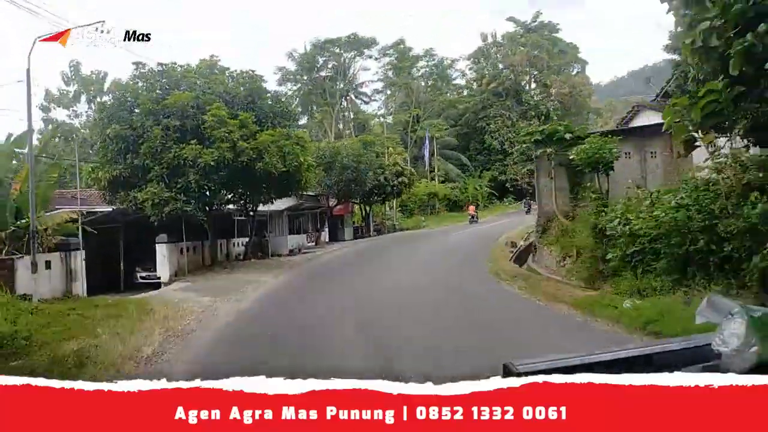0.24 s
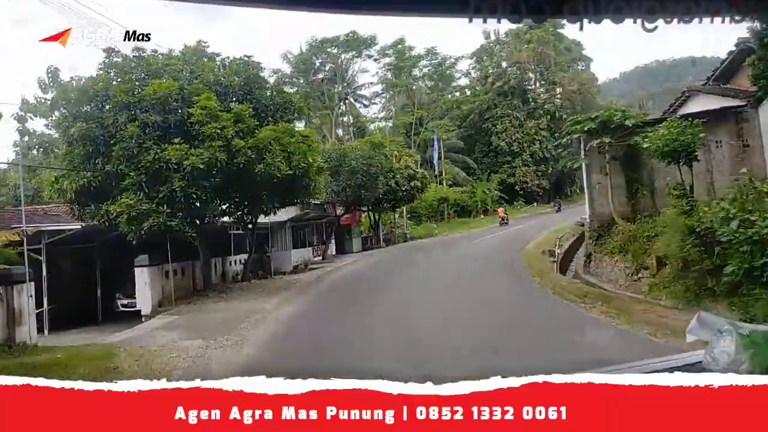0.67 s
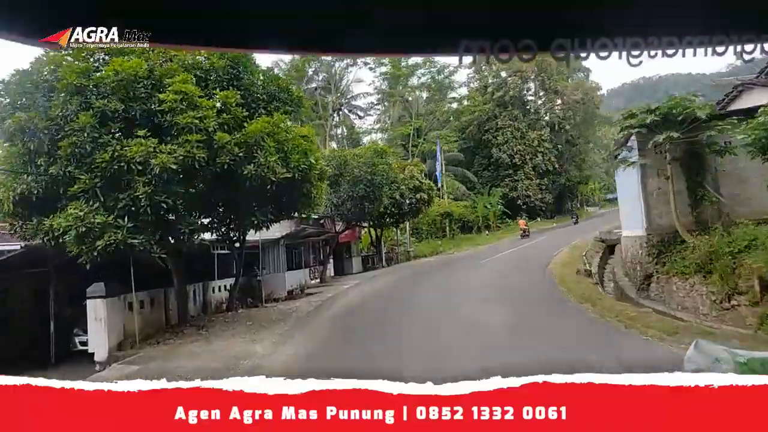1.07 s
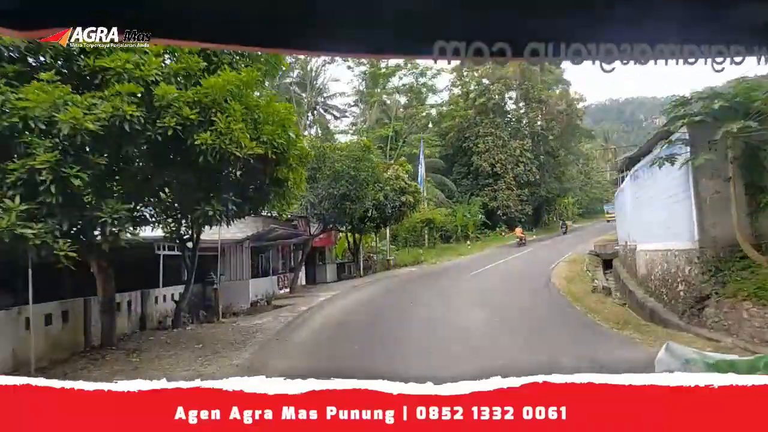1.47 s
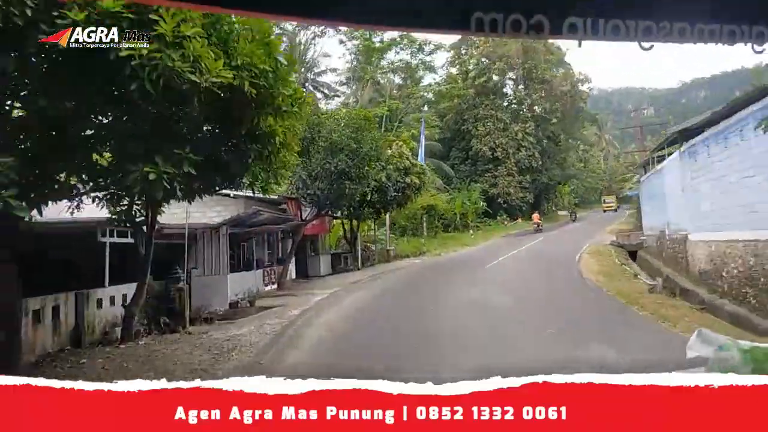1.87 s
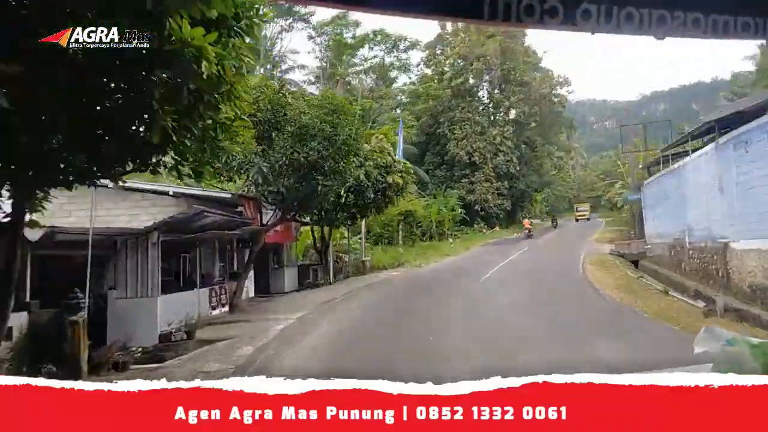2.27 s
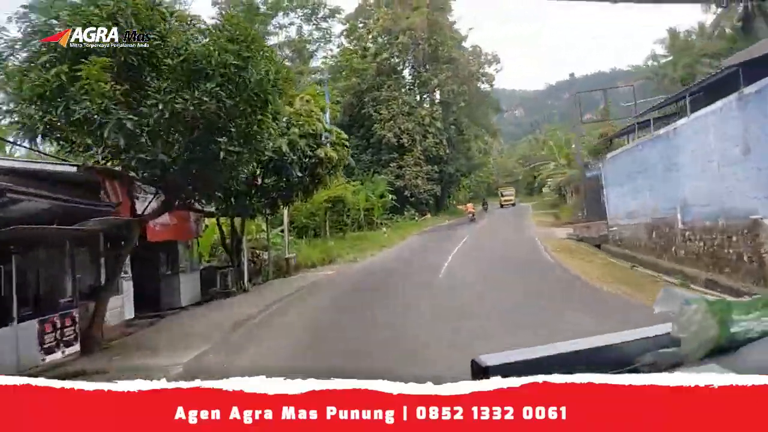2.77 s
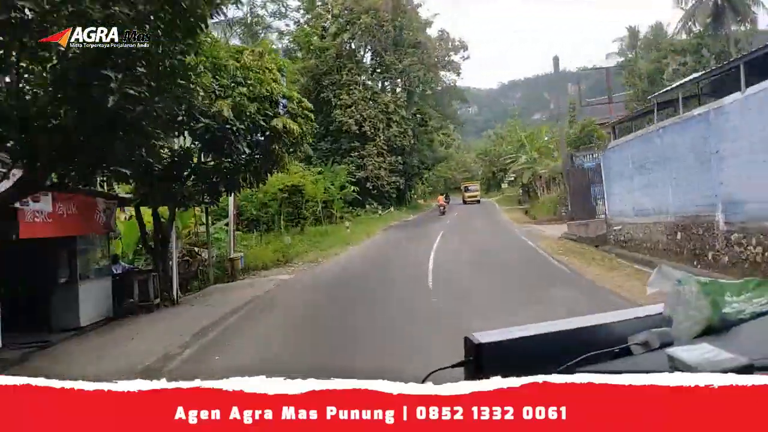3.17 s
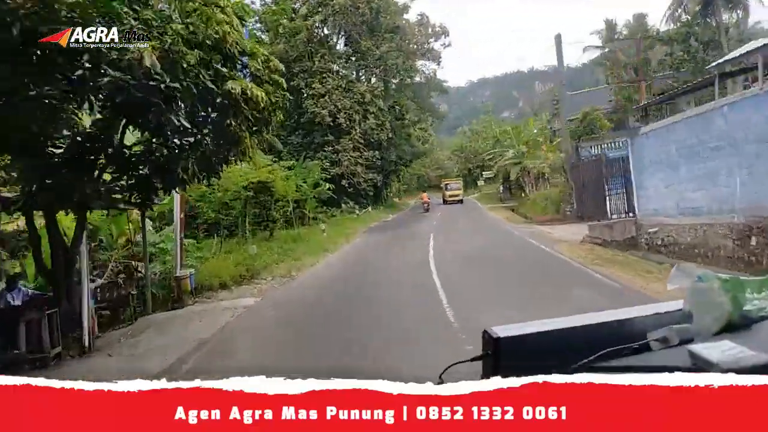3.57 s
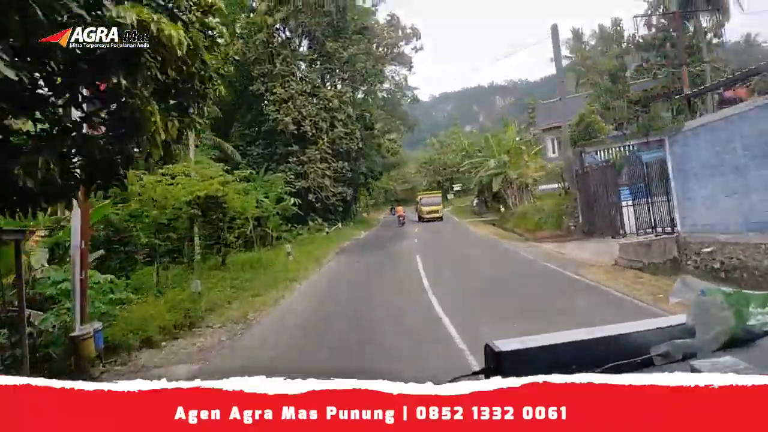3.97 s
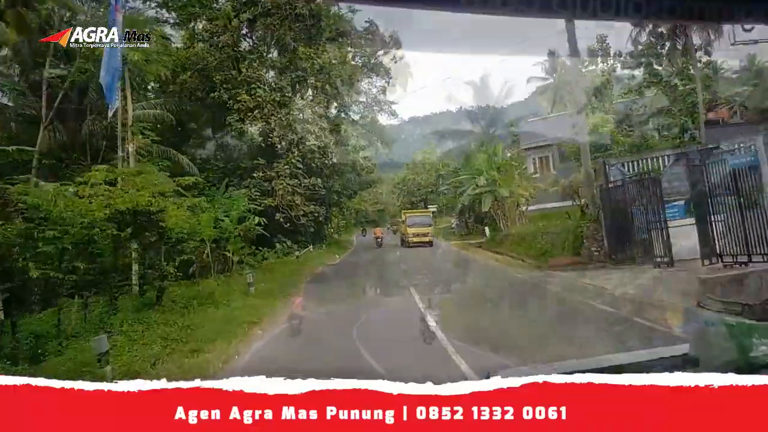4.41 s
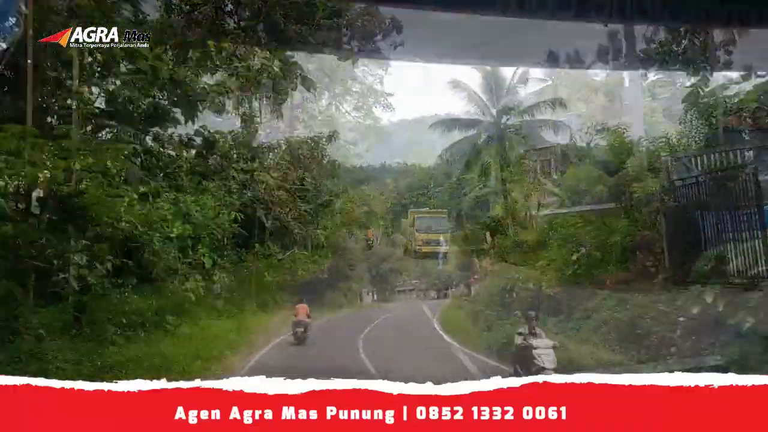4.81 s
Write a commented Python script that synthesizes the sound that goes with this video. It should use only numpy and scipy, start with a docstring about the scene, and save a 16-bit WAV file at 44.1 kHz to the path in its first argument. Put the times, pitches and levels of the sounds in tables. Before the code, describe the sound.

A coach's diesel hums and booms from far behind the cab, heard from just behind the windscreen, its pitch creeping upward. The tyres rumble and the body rocks with low thuds on the uneven road. As the coach leaves a bend, tyre and wind hiss grows louder, joined by brief trim squeaks, faint dashboard rattles and a thin gear whine. The rumble eases slightly towards the end.

```python
"""A six-cylinder diesel drones far behind the cab of a coach on a country road, slowly gaining speed.
Its firing makes a stack of low notes, which boom when they match a pitch the body likes to ring at.
Bumps shake the body, the tyres roar, and a hiss of tyres and air swells as the coach leaves a bend.
Loose things on the dashboard rustle faintly, the trim squeaks a few times, and belts and gears whine."""
import sys
import numpy as np
from scipy import signal
from scipy.fft import rfft, irfft
from scipy.io import wavfile
from scipy.ndimage import uniform_filter1d

SR = 44100
rng = np.random.default_rng(int(sys.argv[2]) if len(sys.argv) > 2 else 0)


def wrap_up_sound(samples):
    """Save the sound to the file named by the first command line argument, as 16-bit audio."""
    columns = np.atleast_2d(samples).T
    # keep every value between -1 and 1, then stretch to whole-number steps
    tamed = np.clip(columns, -1, 1)
    steps = np.round(tamed * 32767).astype(np.int16)
    wavfile.write(sys.argv[1], SR, steps)


N = 222602
TIME = np.arange(N) / SR
FREQS = np.maximum(np.arange(N // 2 + 1) * SR / N, 1)

# Notes of belts and gears. Each row: cycles per engine turn, level in dB, then the pitch in Hz
# at which their housing rings, the width of that ringing in Hz, and its boost in dB.
WHINE_NOTES = [(6.75, -64, 163, 10, 13), (22.4, -70, 590, 10, 11), (37, -73, 913, 16, 12),
               (37.75, -75, 911, 22, 9), (52, -72, 1314, 50, 11)]
# Trim squeaks. Each row: middle and length in seconds, pitch in Hz, tone level in dB, scrape level in dB.
TRIM_SQUEAKS = [(2.03, 0.15, 1885, -45, -55), (2.34, 0.18, 1905, -45.5, -56), (3.9, 0.26, 2225, -50, -52),
                (4.35, 0.21, 1616, -45.5, -66), (4.445, 0.08, 2260, -46.5, -70),
                (4.53, 0.06, 2480, -48, -70), (4.775, 0.04, 2595, -37, -42.5),
                (4.805, 0.018, 2580, -38, -42), (4.995, 0.07, 2560, -42, -43),
                (5.045, 0.055, 2580, -37.5, -40)]
# The strongest jolts on the dashboard. Each row: start in seconds, crinkle level in dB,
# rattle level in dB, seconds to die away by 60 dB.
DASHBOARD_JOLTS = [(.029, -64, -81, .3), (.2, -77, -84, .35), (.49, -70.5, -80, .4), (.56, -78, -86, .5),
                   (.65, -78, -80, .5), (.93, -79, -72, .4), (1.0, -72.5, -80, .4), (1.07, -75, -84, .4),
                   (1.34, -77, -69, .45), (1.62, -69, -77, .45), (1.9, -74, -74, .35),
                   (2.15, -68, -60, .27), (2.268, -60, -63, .25), (2.497, -67, -76, .14),
                   (2.79, -67.5, -67, .38), (3.368, -72, -63, .25), (3.51, -75, -61, .32),
                   (3.683, -67.5, -56.5, .3), (3.944, -68, -61, .25), (4.755, -73, -60, .4),
                   (4.99, -73, -61, .32), (5.025, -69, -60, .32)]
# Bumps in the road. Each row: strongest moment in seconds, level in dB, rocking rate in Hz.
ROAD_BUMPS = [(.07, -22.5, 26), (.27, -18.5, 20.6), (.66, -20, 24), (0.939, -22, 22.8),
              (2.161, -17.5, 15.5), (2.369, -16.5, 19.5), (2.5, -20.5, 24), (2.749, -17.5, 17),
              (2.901, -17.5, 18), (3.161, -22.5, 23.2), (3.299, -16.5, 21.1), (4.081, -19, 23),
              (4.201, -27, 24.6)]
# The rush of tyres and air, which jumps as the coach leaves the bend. Only its rise and fall is used.
# Each row: time in seconds, level in dB.
ROAD_RUSH = [(0, -53.5), (1.2, -55.5), (1.66, -57), (1.82, -47.5), (2.0, -44), (2.6, -43), (2.95, -40.5),
             (4.02, -38.5), (4.35, -42), (4.55, -43), (4.75, -39.5), (5.05, -41.5)]
# Brief surges of the hiss. Each row: middle in seconds, boost in dB.
HISS_SURGES = [(2.78, 3.5), (3.06, 2.5), (3.38, 2), (3.82, 0), (3.97, 2.5)]

# A noise's colour is its mix of low and high. Each row: frequency in Hz, relative strength in dB.
SCRAPE_COLOUR = [(1200, -35), (1850, -7), (2250, 3.5), (2400, 3), (2570, 3), (2720, -1), (2880, -2.5),
                 (3050, -6.5), (3250, -7.5), (3430, -8.5), (3650, -19.5), (5000, -41), (9000, -49)]  # rubbing trim
CRINKLE_COLOUR = [(4000, -16.5), (6000, -10), (8300, -12), (10000, -3.5), (11000, -1), (12700, -7.5),
                  (14000, -13), (16000, -23)]  # thin plastic
RATTLE_COLOUR = [(2200, -8.5), (3300, 5), (4300, -0.5), (5800, -7.5), (7500, -27.5), (10000, -26.5)]  # harder fittings
SHAKE_COLOUR = [(7, -9.5), (13, -6), (21, -0.5), (27, -1), (33, -10), (42, -22), (55, -24.5), (80, -45.5)]  # the body on its springs
RUMBLE_COLOUR = [(35, 5), (47, 8.5), (57, -3.5), (68, 11), (80, 11), (93, 2.5), (125, -0.5), (142, 1),
                 (165, -6.5), (210, -3), (260, -10), (330, -7.5), (420, -13), (550, -16.5), (900, -55)]  # deep road noise
ROAR_COLOUR = [(180, -15), (300, -8), (380, -14), (470, 0.5), (600, -0.5), (680, 3.5), (770, -0.5),
               (920, 1), (1100, -4.5), (1500, -8.5), (2500, -18), (3200, -19.5), (4200, -46.5)]  # tyres
HISS_COLOUR = [(600, -8), (1000, -3.5), (1300, -1.5), (1500, -3), (1830, 0.5), (2050, -1), (2300, 1.5),
               (2550, -3), (2800, -7), (3200, -17), (4000, -26), (5000, -38.5), (7000, -44), (15000, -62.5)]  # tyres and air
SIZZLE_COLOUR = [(3500, 7), (6000, -4.5), (8500, -9), (9500, -4), (10600, 2), (11500, -0.5), (12700, 0.5),
                 (13500, -5), (15700, -4.5)]  # air at the window seals

# Pitches at which the cab rings, colouring roar and hiss. Each row: pitch in Hz, width in Hz, boost in dB.
CAB_RESONANCES = [(592, 16, 4), (660, 16, 2), (1314, 30, 3.5), (1411, 20, 4), (1620, 14, 4),
                  (1830, 50, 2.5), (1915, 30, 3), (2040, 16, 3)]
# Pitches at which the body makes an engine note boom, or drop out if the boost is negative.
# Each row: pitch in Hz, width in Hz, boost in dB.
BODY_RESONANCES = [(65, 2.5, 5), (84.5, 5, 7.5), (90.5, 4, -4), (102.5, 3, 8), (115.5, 4, 5),
                   (196.4, 8.7, 12), (214.1, 19.1, 19), (228.8, 7.6, 9), (233.3, 3, -11), (254, 10, 3),
                   (266, 5, 7), (281, 6, 4), (293.5, 8, 8.5), (299.5, 4, 9), (304.3, 4, -16),
                   (310.3, 4, 7.5), (591.4, 22, 9), (660, 19, 7)]
# How fast the engine turns. Each row: time in seconds, turns per second.
ENGINE_SPEED = [(0, 24.38), (1, 24.0), (1.5, 24.22), (2.5, 24.99), (3, 25.5), (3.5, 25.86), (4, 26.12),
                (4.5, 26.17), (5.05, 26.42)]
# The note of the cylinders firing, three times a turn. Each row: time in seconds, level in dB.
FIRING_LEVEL = [(0, -31), (.18, -30.5), (.44, -44), (.55, -29), (.63, -39), (.8, -40), (.93, -32),
                (1.05, -36), (1.3, -33), (1.5, -40), (1.84, -43), (1.97, -28.5), (2.27, -24), (2.39, -29),
                (2.55, -26), (2.68, -28.5), (2.8, -26), (3.22, -25.5), (3.34, -29), (3.53, -26.5),
                (3.66, -36), (3.85, -33), (4.07, -27), (4.2, -37), (4.42, -31.5), (4.68, -35), (4.9, -32),
                (5.05, -34)]
# The engine's other notes. Each row: cycles per engine turn, level in dB before any boost or fade.
ENGINE_NOTES = [(1.5, -37), (2.5, -44.5), (3.5, -44.5), (4, -56), (4.5, -47.5), (5, -50), (5.5, -59),
                (6, -55), (7.5, -61), (8, -70), (9, -58.5), (10, -56.5), (11, -61.5), (12, -56), (13, -60),
                (13.5, -59), (15, -60), (18, -67), (21, -65), (23, -69), (25, -68), (26, -68)]

# Each road noise has a base level in dB and follows a share of the rush's rise and fall.
SHAKE_DB, SHAKE_FOLLOWS = -27, 0.15
RUMBLE_DB, RUMBLE_FOLLOWS = -35, 0.2
ROAR_DB, ROAR_FOLLOWS = -48, 0.53
HISS_DB, HISS_FOLLOWS = -48.5, 0.96
SIZZLE_DB, SIZZLE_FOLLOWS = -71, 0.32
# From this moment on, the rumble, the roar and the engine's other notes die down.
CALM_FROM_S = 4.03
SECONDS_CALM = np.maximum(TIME - CALM_FROM_S, 0)
RUMBLE_FADE_DB_PER_S, ROAR_FADE_DB_PER_S, NOTES_FADE_DB_PER_S = 8, 6.5, 6.5


def from_db(db):
    """Turn decibels into a number to multiply a sound by."""
    return 10 ** (np.asarray(db) / 20)


def unit_power(x):
    """Scale a signal so that its average power is 1."""
    return x / np.sqrt(np.mean(x ** 2) + 1e-20)


def curve(rows):
    """Join (time, value) points with straight lines, giving a value at every sample."""
    return np.interp(TIME, *np.transpose(rows))


def drift(rate_hz):
    """A random wander of typical size 1 that changes about rate_hz times a second."""
    return unit_power(irfft(rfft(rng.standard_normal(N)) / (1 + (FREQS / rate_hz) ** 4), N))


def boost_db(hz, resonances):
    """How much resonances, the pitches a thing likes to ring at, raise or lower a sound at hz."""
    return sum(db / (1 + (2 * (hz - centre) / width) ** 2) for centre, width, db in resonances)


def noise(colour, resonances=()):
    """Noise of power 1 with the given colour and resonances, falling away steeply at both ends."""
    hz, db = np.transpose(colour)
    shape_db = np.interp(np.log(FREQS), np.log(hz), db) + boost_db(FREQS, resonances)
    ends = np.minimum(FREQS / hz[0], 1) ** 2 * np.minimum(hz[-1] / FREQS, 1) ** 4
    return unit_power(irfft(rfft(rng.standard_normal(N)) * from_db(shape_db) * ends, N))


def steadied(x, samples):
    """Even out the slow swells of a noise, keeping its quick lumps."""
    return x / np.sqrt(uniform_filter1d(x ** 2, samples) + 1e-12)


def swell_db(lead_s=0):
    """How far the rush is above its average, looking lead_s seconds ahead."""
    rush = curve(ROAD_RUSH)
    return np.interp(TIME + lead_s, TIME, rush - rush.mean())


def shower(start, rise_s, decay_s):
    """The loudness of a shower of tiny taps: it builds quickly, then falls 60 dB in decay_s."""
    age = np.maximum(TIME - start, 0)
    return (1 - np.exp(-age / rise_s)) * np.exp(-np.log(1000) * age / decay_s)


def whine(pitch_wander=0.0014, waver_db=2.5):
    """Belts and gears sing thin, wavering notes that follow the engine's speed."""
    speed = curve(ENGINE_SPEED)
    out = np.zeros(N)
    for per_turn, db, *housing in WHINE_NOTES:
        hz = per_turn * speed
        phase = 2 * np.pi * np.cumsum(hz * (1 + pitch_wander * drift(4.4))) / SR
        level_db = db + boost_db(hz, [housing]) + waver_db * drift(4.8)
        out += np.sqrt(2) * from_db(level_db) * np.sin(phase)
    return out


def faint_jolts(count=25, crinkle_db=-77, rattle_db=-78, spread_db=5, decay_s=0.38):
    """Weaker jolts come at random times; the rows are laid out like DASHBOARD_JOLTS."""
    delay, softness = rng.random((count, 2)).T
    starts = (np.arange(count) + delay) / count * TIME[-1]
    drops_db = spread_db * softness
    return [(start, crinkle_db - db, rattle_db - db, decay_s) for start, db in zip(starts, drops_db)]


def rustles(crinkle_rise_s=0.004, rattle_rise_s=0.01, grain_db=1.6):
    """Each jolt sets off a shower of tiny taps: thin plastic crinkles, harder fittings rattle."""
    jolts = DASHBOARD_JOLTS + faint_jolts()
    crinkle = sum(from_db(db) * shower(start, crinkle_rise_s, decay) for start, db, _, decay in jolts)
    rattle = sum(from_db(db) * shower(start, rattle_rise_s, decay) for start, _, db, decay in jolts)
    grain = from_db(grain_db * drift(250))
    return (crinkle * noise(CRINKLE_COLOUR) + rattle * noise(RATTLE_COLOUR)) * grain


def squeaks(wobble_hz=21, chatter_db=2.1):
    """Rubbing trim sticks and slips, making a chattering tone inside a brief scrape."""
    wobble = wobble_hz * drift(64)
    scrape = noise(SCRAPE_COLOUR)
    out = np.zeros(N)
    for middle, length, hz, tone_db, scrape_db in TRIM_SQUEAKS:
        stroke = np.exp(-2 * (2 * (TIME - middle) / length) ** 4)  # a flat-topped hump
        tone = np.sin(2 * np.pi * np.cumsum(hz + wobble) / SR)
        out += stroke * (from_db(tone_db) * tone + from_db(scrape_db) * scrape)
    return out * from_db(chatter_db * drift(110))


def body_shake(rise_s=0.035, fall_s=0.1):
    """The body sways on its springs all the time, and each bump rocks it for a few slow cycles."""
    rocking = np.zeros(N)
    for (crest, db, hz), offset in zip(ROAD_BUMPS, rng.random(len(ROAD_BUMPS))):
        age = TIME - crest
        swing = np.exp(-(age / np.where(age < 0, rise_s, fall_s)) ** 2)
        rocking += np.sqrt(2) * from_db(db) * swing * np.sin(2 * np.pi * (hz * age + offset))
    sway = steadied(noise(SHAKE_COLOUR), samples=4000)
    return rocking + from_db(SHAKE_DB + SHAKE_FOLLOWS * swell_db()) * sway


def tyre_roar(lead_s=0.04):
    """Rolling tyres make a deep rumble and a roar; the roar swells just before the hiss."""
    rumble_db = RUMBLE_DB + RUMBLE_FOLLOWS * swell_db() - RUMBLE_FADE_DB_PER_S * SECONDS_CALM
    roar_db = ROAR_DB + ROAR_FOLLOWS * swell_db(lead_s) - ROAR_FADE_DB_PER_S * SECONDS_CALM
    rumble = from_db(rumble_db) * steadied(noise(RUMBLE_COLOUR), samples=8000)
    return rumble + from_db(roar_db) * noise(ROAR_COLOUR, CAB_RESONANCES)


def road_hiss(surge_s=0.12, flutter_db=1.16, grain_db=1.0):
    """Tyres and air hiss, surging and fluttering on uneven asphalt; the window seals sizzle thinly."""
    surges_db = sum(db * np.exp(-(2 * (TIME - middle) / surge_s) ** 2) for middle, db in HISS_SURGES)
    hiss_db = HISS_DB + HISS_FOLLOWS * swell_db() + surges_db + flutter_db * drift(28)
    hiss = from_db(hiss_db) * noise(HISS_COLOUR, CAB_RESONANCES)
    sizzle_db = SIZZLE_DB + SIZZLE_FOLLOWS * swell_db() + grain_db * drift(120)
    return hiss + from_db(sizzle_db) * noise(SIZZLE_COLOUR)


def engine(follows_rush=0.24, jitter_radians=0.1):
    """The diesel's notes rise with its speed and boom in the body; uneven burning makes them waver."""
    speed = curve(ENGINE_SPEED)
    turns = np.cumsum(speed) / SR
    effort_db = follows_rush * swell_db() - NOTES_FADE_DB_PER_S * SECONDS_CALM

    def note(per_turn, db, waver_db):
        phase = 2 * np.pi * (per_turn * turns + rng.random()) + jitter_radians * drift(6.4)
        return np.sqrt(2) * from_db(db + waver_db * drift(7.5)) * np.sin(phase)

    out = note(per_turn=3, db=curve(FIRING_LEVEL), waver_db=1.0)
    for per_turn, db in ENGINE_NOTES:
        boom_db = boost_db(per_turn * speed, BODY_RESONANCES)
        out += note(per_turn, db + boom_db + effort_db, waver_db=0.6)
    return out


def scene():
    """Everything heard behind the windscreen, added into one channel."""
    return (engine() + body_shake() + tyre_roar() + road_hiss() + rustles() + squeaks() + whine())[None]


def record(dry, fade_s=0.0016, cutoff_hz=15700):
    """Fade both ends so that they do not click, and cut away the very highest treble."""
    edges = np.clip(np.minimum(TIME, TIME[-1] - TIME) / fade_s, 0, 1)
    low_pass = signal.ellip(10, .1, 80, cutoff_hz, fs=SR, output="sos")
    return signal.sosfilt(low_pass, dry * edges)


dry = scene()
out = record(dry)
wrap_up_sound(out)
```